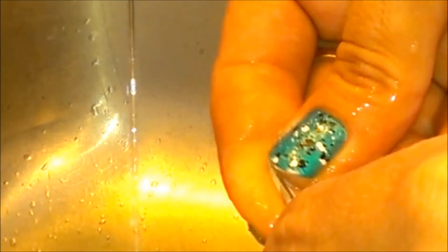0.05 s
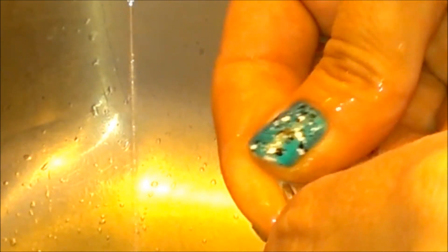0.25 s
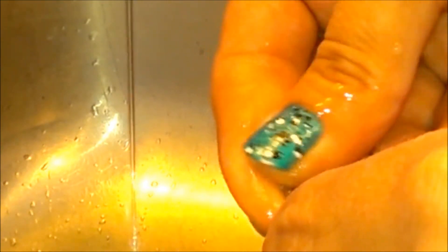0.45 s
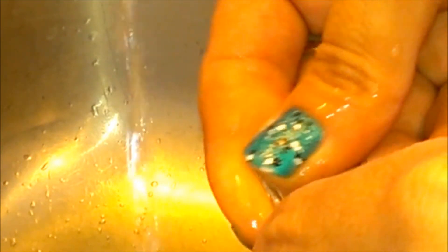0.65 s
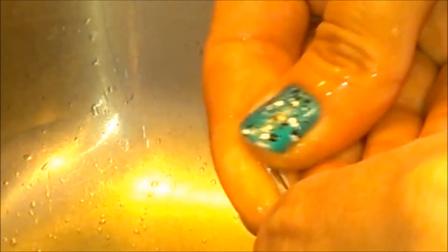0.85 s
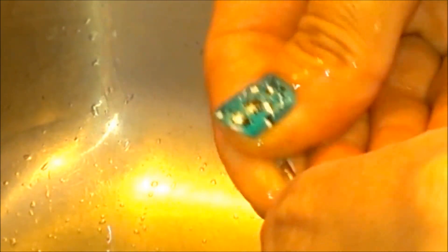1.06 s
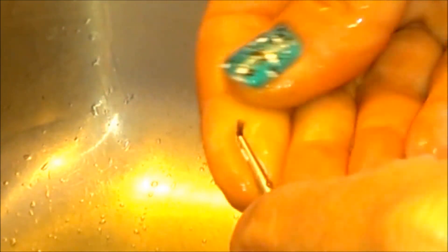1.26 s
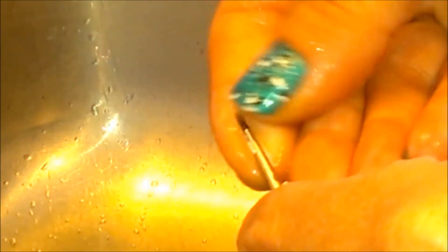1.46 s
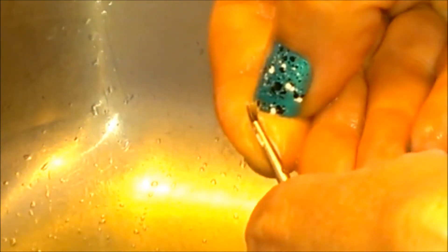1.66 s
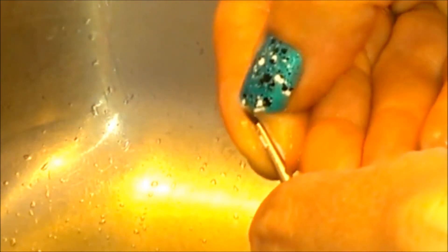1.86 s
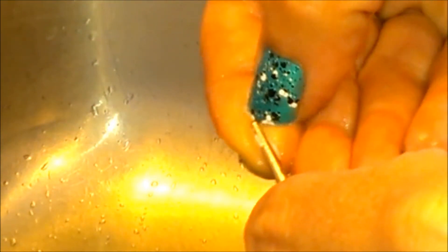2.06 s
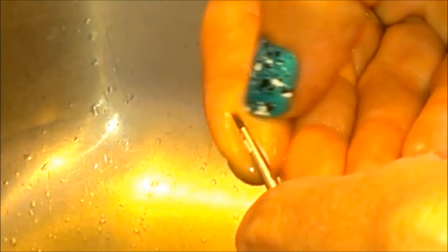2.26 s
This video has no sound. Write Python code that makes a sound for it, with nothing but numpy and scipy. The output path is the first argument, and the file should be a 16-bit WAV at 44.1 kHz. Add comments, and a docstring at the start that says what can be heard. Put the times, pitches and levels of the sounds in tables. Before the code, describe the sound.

Small wet clicks and drips come from wet fingers and a little brush over a steel sink. A soft low thump comes first, then drips plop and gurgle briefly, close to the microphone in a small room.

```python
"""Small wet clicks and a soft low thump come first, then drips that plop and gurgle in a steel sink.
Wet fingers and a small brush work close to the microphone, and films of water snap as they move.
Each drip rings a pocket of air; the thump is a lumpy puff with the room's low resonances ringing.
The basin's walls echo and ring, a small room answers, and a low rumble and hiss lie underneath."""
import sys
import numpy as np
from scipy import signal
from scipy.fft import rfft, irfft
from scipy.io import wavfile

SR = 44100
rng = np.random.default_rng(int(sys.argv[2]) if len(sys.argv) > 2 else 0)


def materialize(psi):
    """Save the field psi as 16-bit PCM at rate SR to the path in sys.argv[1].

    A 1-D psi becomes a single channel; in a 2-D psi each row is a channel.
    """
    bounded = np.clip(np.atleast_2d(psi).T, -1, 1)
    quanta = np.round(bounded * 32767).astype(np.int16)
    wavfile.write(sys.argv[1], SR, quanta)


N = 105840
T = np.arange(N) / SR

# snapping water films: t/s, level/dB, centre f/Hz, width/octaves, crackle decay/ms, left-right/dB
FILM_SNAPS = [(0.1422, -45, 5100, 0.19, 6.6, 4.5), (.165, -52, 5160, 0.1, 25, -8),
              (0.213, -56, 5870, 0.11, 10, -3), (.1415, -53, 6630, 0.57, 1.7, -3),
              (0.238, -48, 5400, 0.26, 9.7, -5), (0.263, -50.5, 5560, 0.12, 9, -2.5),
              (.294, -59, 5770, 0.18, 10, -8), (.323, -58, 9030, 0.22, 4.2, -1),
              (.694, -70, 5050, 0.18, 0.9, -2), (0.836, -56.5, 7200, 1.4, 1.5, 1),
              (0.89, -48.5, 6300, 0.93, 6.6, 1.5), (.918, -55, 6460, 0.82, 8, -5),
              (0.9388, -32.5, 4720, 0.27, 0.76, 4), (0.9391, -40.5, 3860, 0.2, 1.1, 4.5),
              (.9395, -46.5, 3325, 0.18, 3.2, -7), (.940, -36, 6250, .2, 1, 0.5),
              (.955, -57, 5200, 1.1, 1.7, -5), (0.939, -41.5, 7700, 0.59, 1.2, -2.5),
              (.947, -48, 5800, 0.46, 1.7, -18), (1.102, -56.5, 5550, 0.62, 2.7, 6),
              (1.105, -48.5, 6680, 0.17, 2.6, 4), (1.106, -57, 8900, 0.44, 4.4, -1),
              (1.131, -57, 5370, 0.51, 0.82, -2), (1.161, -55.5, 7670, 0.51, 2.1, 0),
              (1.219, -51, 4780, .3, 9, 3.5), (1.2413, -48, 4680, 0.27, 1.8, 3),
              (1.249, -45, 4476, 0.072, 7, -1.5), (1.260, -60, 8900, 0.24, 4, 0),
              (1.297, -45, 5580, 0.63, 6, 16), (1.296, -51, 7870, 0.36, 1.1, -6),
              (1.31, -47.5, 5000, 0.49, 5.2, -14), (1.32, -43.5, 8930, 0.31, 4.7, -4),
              (1.3222, -37.5, 5030, 0.43, 4.5, 8.5), (1.331, -36, 4850, 0.26, 7, -3),
              (1.345, -50, 3830, 0.045, 4, -9), (1.356, -48.5, 1980, 0.38, 3, -2),
              (1.374, -56.5, 1860, 0.36, 16, 23), (1.3866, -35.5, 1480, 0.78, 2.9, -1),
              (1.388, -44, 6000, 0.93, 5.6, 5), (1.391, -50.5, 4000, 0.16, 4.6, -8),
              (1.42, -55.5, 1340, 0.9, 42, 25), (1.42, -52, 5400, 0.33, 35, 2),
              (1.457, -34.5, 1280, 0.45, 4.2, -2.5), (1.472, -45, 1296, 0.32, 7, 12),
              (1.484, -44, 1910, 0.32, 1.1, 12.5), (1.489, -43.5, 3900, 0.61, 4.5, 3),
              (1.64, -55.5, 3410, 0.34, 18, 4.5), (1.644, -53.5, 7800, .5, 8, 3.5),
              (1.6672, -43.5, 7270, 0.72, 3.5, 1.5), (1.666, -48.5, 3930, 0.66, 9, 0),
              (1.699, -46.5, 2100, .15, 2.7, -1), (1.716, -50, 1390, 0.91, 2.2, 4),
              (1.726, -60, 6100, 0.38, 10, 2.5), (1.755, -77, 7500, 1.0, 3, 0),
              (1.781, -59, 1900, 0.3, 1.4, 3), (1.784, -59, 4260, 0.47, 5.6, 1),
              (1.835, -34, 7350, 1, 3, 2), (1.835, -45.5, 2933, 0.25, 1.8, 0),
              (1.835, -47.5, 2010, 1.3, 1.3, -4), (1.839, -38, 4330, 0.42, 0.35, 2.5),
              (1.843, -35, 5700, 0.38, 0.4, 7), (1.892, -56.5, 3310, 0.13, 6, -2),
              (2.026, -54.5, 7870, 0.43, 3.1, -2), (2.183, -65, 5240, 0.13, 6.8, 7),
              (2.253, -57, 4060, 0.45, 11, -1), (2.264, -53, 6400, 0.31, 9.5, 4)]
# air pockets rung by drips: t/s, peak level/dB, starting f/Hz, rise/s, decay/s
AIR_POCKETS = [(.915, -52.5, 952, 0.017, 0.0082), (.996, -46, 944, 0.0033, 0.0055),
               (1.008, -45.5, 975, 0.0017, 0.0094), (1.022, -61, 990, 0.022, .04),
               (1.299, -50.5, 653, 0.0035, .008), (1.302, -45.5, 830, 0.015, 0.0097),
               (1.318, -34.5, 870.4, 0.015, 0.0031), (1.336, -37.5, 872, 0.009, 0.0036),
               (1.446, -28, 870, .009, 0.0055), (1.446, -37, 652, 0.0068, 0.02),
               (1.386, -39.5, 897, 0.0046, 0.018), (1.470, -32, 833, 0.0029, 0.0048),
               (1.452, -39.5, 751, 0.0045, 0.015), (1.558, -51, 822, 0.022, 0.025),
               (2.056, -54, 860, 0.0087, 0.011), (2.075, -45.5, 856, 0.0042, 0.0061),
               (2.088, -50.5, 849, 0.0087, 0.013)]
# soft low pulses, most making up a lumpy puff near 0.2 s, the later ones giving low knocks under clicks: t/s,
# relative level/dB, low-pass f/Hz
LOW_PULSES = [(.186, -40, 900), (.198, -35.5, 700), (0.2101, -21, 300), (0.2321, -27.5, 300),
              (0.2389, -25.5, 302), (.263, -22, 167), (.300, -29.5, 170), (.432, -47.5, 297),
              (.935, -50, 496), (1.834, -51, 500)]
# low resonances of the room: f/Hz, gain/dB, T60/s
ROOM_MODES = [(113, -20, 0.2), (136.6, -10.5, 0.2), (183, -6, .14), (159, -3, .035), (226, -9.5, 0.089),
              (259, -11.5, 0.065), (316, -14, 0.091), (347, -10.5, .1), (380, -16, .09), (424, -30, .06),
              (610, -18, 0.049)]
# spectrum of skin rubbing on steel: f/Hz, relative level/dB
RUB_SPECTRUM = [(100, 1), (400, 9.5), (900, -2.5), (1500, -10), (4000, -11), (5000, 3), (5700, -6),
                (6600, -4.5), (10000, -16)]
# envelope of the crackle of wet skin: t/s, level/dB
SKIN_ENVELOPE = [(0, -78), (.15, -66), (.35, -67.5), (.5, -75.5), (.8, -72.5), (.88, -63), (1.08, -63),
                 (1.2, -64.5), (1.4, -55), (1.58, -65), (1.72, -59), (2.0, -64.5), (2.15, -66), (2.4, -65)]
# spectrum of that crackle: f/Hz, relative level/dB
SKIN_SPECTRUM = [(300, 1), (1000, -1), (2400, -5), (4000, -1), (5500, 1.5), (7000, 3), (10000, -1.5)]
# reflections from the basin's walls: left delay/ms, right delay/ms, gain/dB
WALL_ECHOES = [(1.3, 1.082, -7.5), (6.4, 4.7, -14), (8.5, 8.1, -5), (15.2, 15.6, -28.5)]
# modes of the steel basin, driven by the wet sounds: f/Hz, relative gain/dB, T60/s
STEEL_MODES = [(651, -7, .17), (743, -14, .22), (838, -10, .15), (885, -11, .15), (995, -13, .17),
               (1157, -14, .15), (1249, -7, .1), (1296, -9, .15), (1408, -9, .16), (1570, -12, .15),
               (3190, -13, .1), (3810, -10, .08), (4442, -8, .1), (4545, -13, .1), (4730, -13, .1),
               (5145, -12, .13), (5790, -14, .12), (6360, -10, .1), (8795, -12, .1)]
# stereo balance of the wet sounds at the microphone: f/Hz, left-right/dB
NEAR_BALANCE = [(100, -1.5), (250, 4), (900, 2.5), (2000, -0.2), (4500, 4.5), (6000, -11), (7500, -3.5),
                (10000, -5)]
# spectrum of the room's rumble: f/Hz, relative level/dB
RUMBLE_SPECTRUM = [(40, -45), (80, -27.5), (110, -2), (145, -17), (178, 3), (205, -6.5), (250, -3.5),
                   (330, -3.5), (450, -14.5), (900, -14.5), (1500, -32.5), (4000, -67)]
# slow envelope of the rumble: t/s, level/dB
RUMBLE_ENVELOPE = [(0, -64), (.1, -56), (.42, -62), (.56, -64), (.67, -61.5), (.8, -65), (.92, -53.5),
                   (1.05, -63.5), (1.2, -60.5), (1.45, -57), (1.65, -62.5), (1.95, -60.5), (2.25, -63),
                   (2.4, -59.5)]
# spectrum of the hiss: f/Hz, relative level/dB
HISS_SPECTRUM = [(20, 3), (60, 7), (400, 1.5), (950, 11.5), (1300, 5), (2200, 0.5), (4000, -1), (5300, 2),
                 (7500, -3.5), (10500, -5.5)]


def film_clicks():
    """Transient excitation: a water film snaps and crackles, and the gap it opens sets the pitch."""
    out, t = np.zeros((2, N)), T[:SR // 10]
    crackle_share, splash_db = 0.69, -27
    level_window_s = 0.0073  # a click has the energy of its level held this long
    for start_s, db, hz, octaves, decay_ms, pan_db in FILM_SNAPS:
        burst = rng.standard_normal(len(t)) * swell(t, rise_s=0.0017, decay_s=decay_ms / 1e3)
        crackle = unit(band(burst, hz, octaves))
        snap = unit(band(signal.unit_impulse(len(t)), hz, octaves))
        short_burst = rng.standard_normal(len(t)) * np.exp(-t / 0.0018)
        splash = unit(band(short_burst, hz * 1.85, octaves=0.91))
        click = unit(crackle_share * crackle + (1 - crackle_share) * snap + from_db(splash_db) * splash)
        add(out, start_s, pan(pan_db) * from_db(db) * np.sqrt(level_window_s * SR) * click)
    return out


def drips():
    """Bubble resonance: an air pocket rings, its pitch rising slightly as it nears the surface."""
    out, t = np.zeros(N), T[:SR // 6]
    glide_per_s, flutter_depth, push_db = 0.33, 0.044, -16.5
    for start_s, db, hz, rise_s, decay_s in AIR_POCKETS:
        flutter = band_noise(len(t), hz=90.4, octaves=1.6)  # the pocket changes shape
        pitch_hz = hz * (1 + glide_per_s * t + flutter_depth * flutter)
        note = np.sin(2 * np.pi * np.cumsum(pitch_hz) / SR)
        dull_push = from_db(push_db) * band_noise(len(t), hz=289, octaves=0.68)
        add(out, start_s, from_db(db) * swell(t, rise_s, decay_s) * (note + dull_push))
    return out


def low_thump():
    """Modal response: soft low pulses form a lumpy puff and later low knocks, and the room's low resonances
    ring."""
    puff, impulse = np.zeros(N), signal.unit_impulse(SR // 20)
    for start_s, db, cutoff_hz in LOW_PULSES:
        softness = signal.butter(2, cutoff_hz, fs=SR, output="sos")
        add(puff, start_s, from_db(db) * signal.sosfilt(softness, impulse))
    thump = sum(from_db(db) * ring(puff, hz, t60) for hz, db, t60 in ROOM_MODES)
    low_cut = signal.butter(8, 105, "high", fs=SR, output="sos")
    return signal.sosfilt(low_cut, thump)


def skin_rub():
    """Friction noise: skin slides on the steel during the thump."""
    start_s, peak_db = 0.17, -44.5
    envelope = from_db(peak_db) * swell(T - start_s, rise_s=0.062, decay_s=0.053)
    return envelope * coloured(stereo_noise(correlation=0.6), RUB_SPECTRUM)


def skin_crackle():
    """Shot noise: wet fingers and bristles shift, giving tiny ticks at random instants."""
    ticks_per_s, spread_db = 5000, 2.5
    sizes = from_db(spread_db * np.minimum(rng.exponential(1, N), 5))
    signs = rng.choice([-1, 1], N)
    occurs = rng.random(N) < ticks_per_s / SR
    return curve(SKIN_ENVELOPE) * coloured(sizes * signs * occurs, SKIN_SPECTRUM)


def basin_response(wet):
    """Reflection and forced vibration: wall echoes and ringing steel join the direct sound."""
    near, steel_db = wet.copy(), 4
    for left_ms, right_ms, db in WALL_ECHOES:
        for side, delay_ms in enumerate((left_ms, right_ms)):
            near[side] += from_db(db) * np.interp(T - delay_ms / 1e3, T, wet[side], left=0)
    for hz, db, t60 in STEEL_MODES:
        resonant_gain = t60 * SR / (2 * np.log(1000))
        near += from_db(steel_db + db) * ring(wet, hz, t60) / resonant_gain
    return irfft(rfft(near) * pan(per_bin(NEAR_BALANCE)), N)


def room_reverberation(wet):
    """Diffuse reflection: the small room answers with an exponentially decaying tail."""
    gain_db, t60 = -5, 0.2
    envelope = swell(T, rise_s=0.011, decay_s=t60 / np.log(1000))
    tail = unit(stereo_noise(correlation=0.32) * envelope)
    return from_db(gain_db) * signal.fftconvolve(wet.mean(axis=0)[None], tail, axes=1)[:, :N]


def background():
    """Ambient noise: a low room rumble wavers by amplitude modulation under a steady hiss."""
    waver_rms_db, hiss_db = 1.5, -66
    waver = unit(band(rng.standard_normal(2 * N), hz=19.9, octaves=2.18)[N:]) * np.sqrt(N)
    envelope = curve(RUMBLE_ENVELOPE) * from_db(waver_rms_db * waver)
    rumble = envelope * coloured(stereo_noise(correlation=0.89), RUMBLE_SPECTRUM)
    hiss = from_db(hiss_db) * coloured(stereo_noise(correlation=0.13), HISS_SPECTRUM)
    return rumble + hiss


def from_db(db):
    """Amplitude ratio of a level in decibels."""
    return 10 ** (np.asarray(db) / 20)


def unit(x):
    """Normalisation to unit energy."""
    return x / np.sqrt(np.sum(x ** 2, axis=-1, keepdims=True) + 1e-20)


def pan(db):
    """Left and right gains for a level difference."""
    return from_db(np.outer([.5, -.5], db))


def curve(points):
    """Amplitude envelope through points of t/s, level/dB."""
    return from_db(np.interp(T, *np.transpose(points)))


def per_bin(points):
    """Interpolation of a table over logarithmic frequency."""
    hz, value = np.transpose(points)
    bin_hz = np.arange(N // 2 + 1) * SR / N
    return np.interp(np.log(bin_hz + 1), np.log(hz), value)


def coloured(x, spectrum):
    """Spectral shaping of a noise, at unit rms."""
    return unit(irfft(rfft(x) * from_db(per_bin(spectrum)), N)) * np.sqrt(N)


def stereo_noise(correlation):
    """Partial coherence: white noise partly shared by left and right."""
    mid, side = rng.standard_normal((2, N))
    return np.sqrt(1 + correlation) * mid + np.sqrt(1 - correlation) * side * [[1], [-1]]


def band(x, hz, octaves):
    """Band-pass filtering about a centre frequency."""
    edges = np.clip(hz * 2 ** (np.array([-.5, .5]) * octaves), 10, .48 * SR)
    return signal.sosfilt(signal.butter(3, edges, "band", fs=SR, output="sos"), x + 1e-18)


def band_noise(samples, hz, octaves):
    """Band-limited noise of unit rms."""
    return unit(band(rng.standard_normal(samples), hz, octaves)) * np.sqrt(samples)


def ring(x, hz, t60):
    """Damped oscillator: a unit impulse starts a decaying sine of unit amplitude."""
    radius, angle = from_db(-60 / (t60 * SR)), 2 * np.pi * hz / SR
    return signal.lfilter([0, np.sin(angle)], [1, -2 * radius * np.cos(angle), radius ** 2], x + 1e-18)


def swell(t, rise_s, decay_s):
    """A smooth rise, then exponential decay."""
    rise = np.sin(np.pi / 2 * np.clip(t / rise_s, 0, 1)) ** 2
    return rise * np.exp(-np.maximum(t - rise_s, 0) / decay_s)


def add(out, start_s, x):
    """Superposition of a short sound at a given time."""
    i = int(start_s * SR)
    out[..., i:i + x.shape[-1]] += x[..., :N - i]


def scene():
    """Superposition: wet sounds in basin and room, the thump slightly left, and the background."""
    wet = film_clicks() + drips() + skin_crackle()
    wet_in_room = basin_response(wet) + room_reverberation(wet)
    thump_and_rub = pan(db=1.7) * (low_thump() + skin_rub())
    return wet_in_room + thump_and_rub + background()


def record(dry):
    """Band limiting: a steep zero-phase low-pass removes the highest treble."""
    cutoff_hz = 10600
    return signal.sosfiltfilt(signal.ellip(10, .1, 50, cutoff_hz, fs=SR, output="sos"), dry)


dry = scene()
out = record(dry)
materialize(out)
```